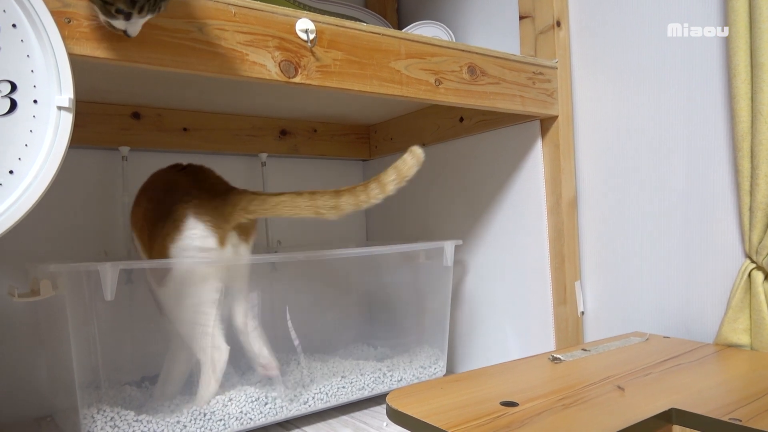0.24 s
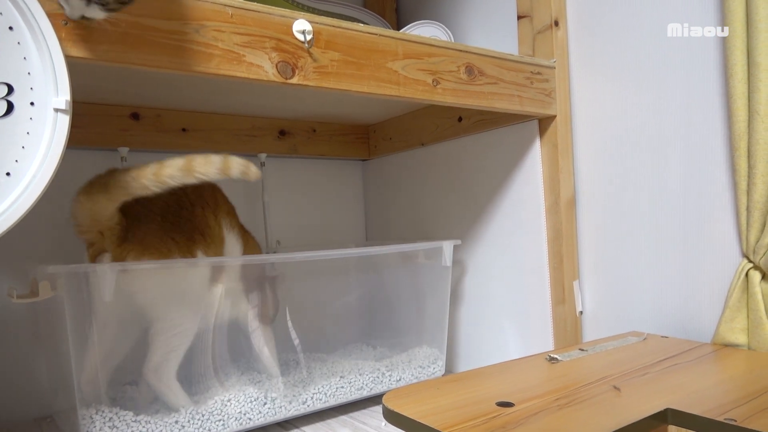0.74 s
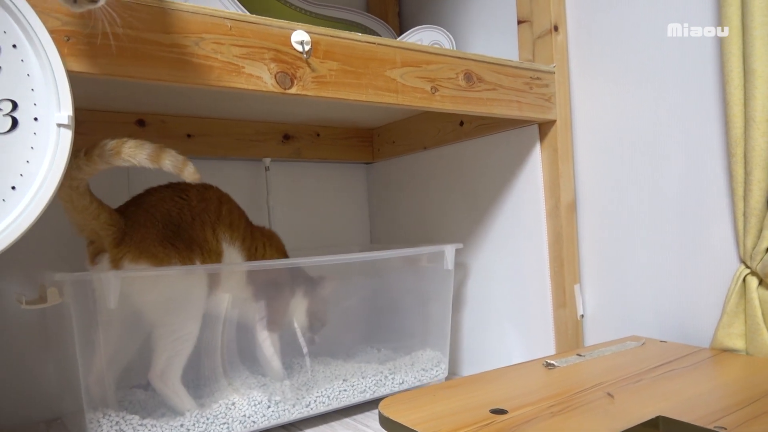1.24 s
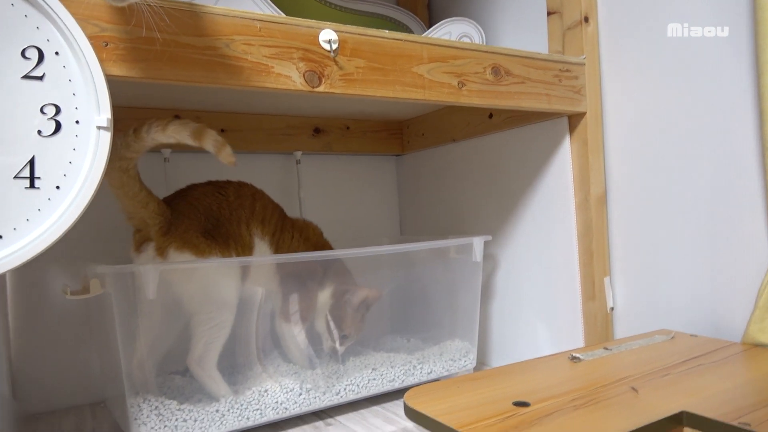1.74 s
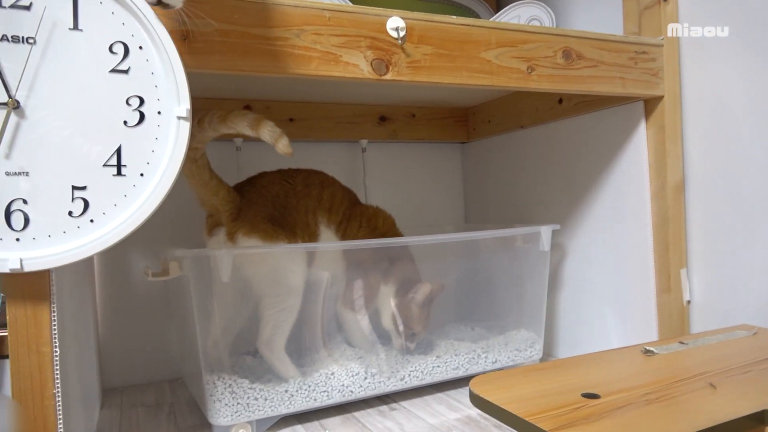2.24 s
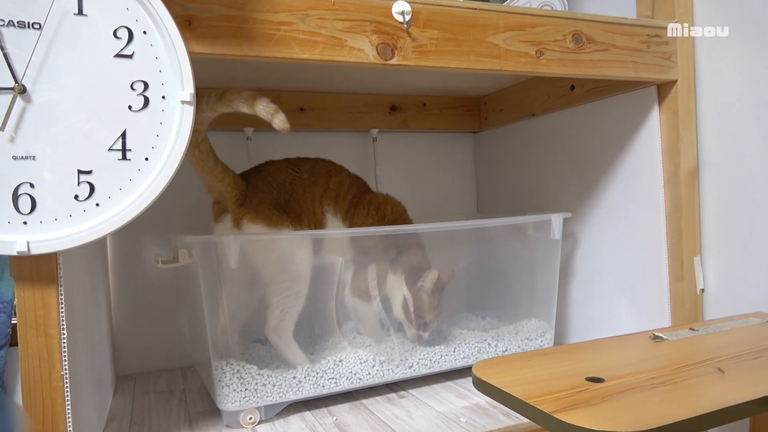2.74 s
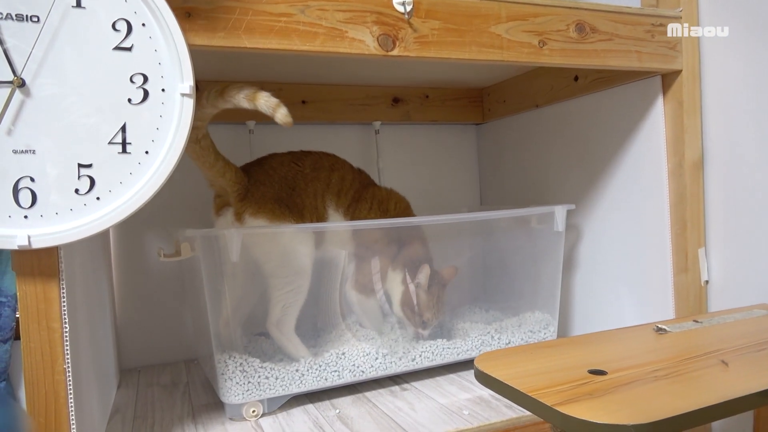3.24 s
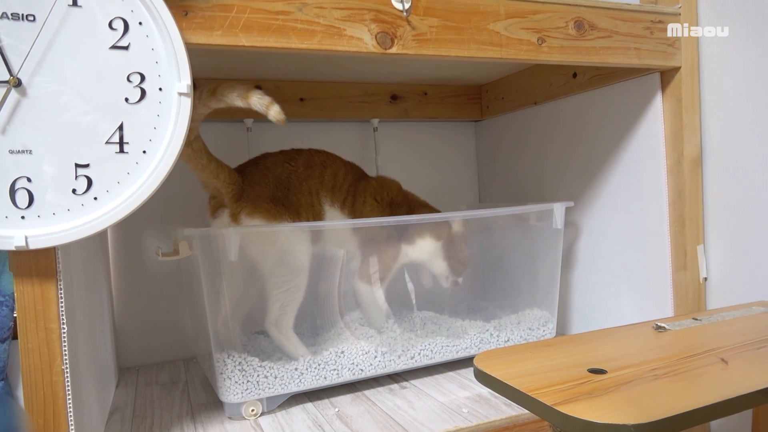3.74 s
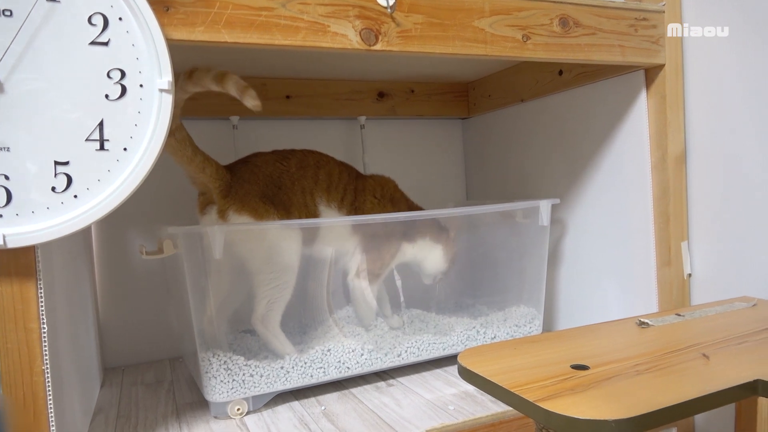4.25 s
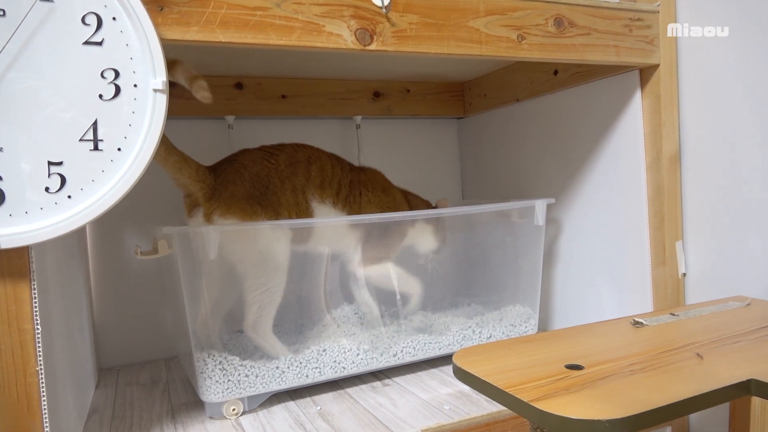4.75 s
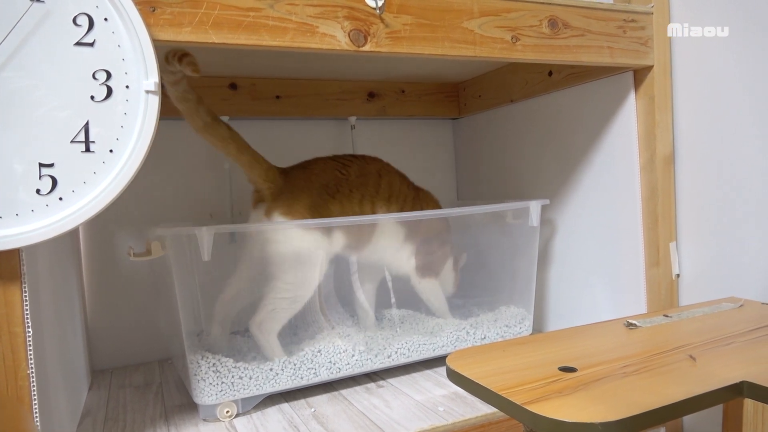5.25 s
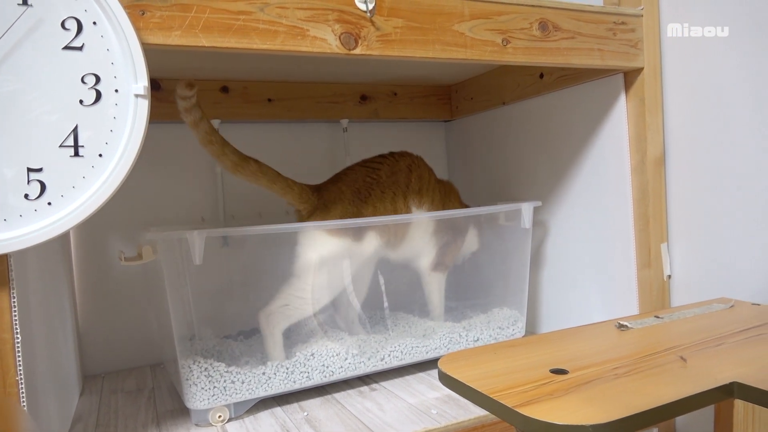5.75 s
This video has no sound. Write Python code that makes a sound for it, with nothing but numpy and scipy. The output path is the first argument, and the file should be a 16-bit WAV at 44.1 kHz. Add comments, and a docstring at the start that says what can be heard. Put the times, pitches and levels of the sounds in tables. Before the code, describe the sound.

Pellet litter crunches and rattles in short bursts as a cat digs, its paws and flung pellets knocking against a plastic box.

```python
"""Cat raking litter

A cat turns round and rakes pellet litter in a big plastic tub in a wooden alcove. Each stroke bites,
pushes and settles: an avalanche of pellet collisions that sounds through the tub. Light treads crunch
in between, and paws and flung pellets knock on the walls. Soft low bumps and a faint room hush lie
underneath, with a few faint high squeaks and a passing hum."""
import sys
import numpy as np
from scipy import signal
from scipy.fft import rfft, irfft
from scipy.io import wavfile
from scipy.ndimage import uniform_filter1d

SR = 44100
rng = np.random.default_rng(int(sys.argv[2]) if len(sys.argv) > 2 else 0)


def unload_wav(signal):
    """Save mono or channel-first audio to the path in sys.argv[1] as 16-bit WAV at rate SR, clipped to [-1, 1]."""
    wavfile.write(
        sys.argv[1],
        SR,
        np.round(np.clip(np.atleast_2d(signal).T, -1, 1) * 32767).astype(np.int16),
    )


N = 264600
TIME = np.arange(N) / SR


def from_db(db):
    return 10 ** (np.asarray(db) / 20)


def rms_one(x):
    return x / np.sqrt(np.mean(x ** 2) + 1e-20)


def fader(rows):
    """Gain curve through (t/s, level/dB) points, fading quickly outside their span."""
    times, levels = np.transpose(rows)
    gate = np.interp(TIME, [times[0] - .01, times[0], times[-1], times[-1] + .02], [0, 1, 1, 0])
    return gate * from_db(np.interp(TIME, times, levels))


def swell(start, length):
    """Envelope that peaks a quarter of the way in and has mostly faded by the end."""
    age = np.maximum(TIME - start, 0) * 4 / length
    return age * np.exp(1 - age)


def drift(per_s):
    """Random modulation gliding between points of spread 1."""
    knots = rng.standard_normal(4000)
    return np.interp(TIME * per_s, np.arange(len(knots)), knots)


def colour(x, spectrum):
    """Minimum-phase EQ through (f/Hz, relative level/dB) points; white noise keeps its power."""
    size = 4096
    hz, db = np.transpose(spectrum)
    log_bins = np.log(np.fft.rfftfreq(size, 1 / SR) + 1)
    gain = rms_one(from_db(np.interp(log_bins, np.log(hz), db)))
    cepstrum = irfft(np.log(gain))
    cepstrum[1:size // 2] *= 2
    cepstrum[size // 2 + 1:] = 0
    return signal.oaconvolve(x, irfft(np.exp(rfft(cepstrum))))[:len(x)]


def resonance(x, hz, q, lift_db):
    """The ringing band that, added to x, boosts it by lift_db at hz."""
    return (from_db(lift_db) - 1) * signal.lfilter(*signal.iirpeak(hz, q, SR), x)


def ring_out(t60, rise_s):
    """Countless overlapping modes: noise that builds up and dies, with energy 1."""
    t = TIME[:SR // 2]
    tail = rng.standard_normal(len(t)) * from_db(-60 * t / t60) * (1 - np.exp(-t / rise_s))
    return tail[t < 2 * t60] / np.linalg.norm(tail)


def push(start, length, bite_db, end_db, fall_db_per_s, bite_db_per_s=1083):
    """Envelope of one paw move: a quick bite, a ramp while it pushes, a fall as the heap settles."""
    ages = [-.05, 0, length, length + 1]
    levels = [bite_db + ages[0] * bite_db_per_s, bite_db, end_db, end_db - fall_db_per_s]
    active = (TIME > start + ages[0]) & (TIME < start + ages[-1])
    gain = np.zeros(N)
    gain[active] = from_db(np.interp(TIME[active] - start, ages, levels))
    return gain


# Paw moves; levels are crunch sends, and boom and rattle are offsets from them, all ahead of the mix.
# Light treads and small slides: t/s, level/dB, boom/dB, rattle/dB
PAW_TREADS = [(0.0, -38, -12.5, -15), (0.083, -41, 0.5, -11), (0.35, -51.5, 1, -41),
              (0.408, -49, -0.5, -13), (0.76, -43.5, -7, -13), (0.836, -40.5, -7, -10),
              (0.96, -50.5, -4, -12), (1.258, -48.5, -15, -7.5), (1.51, -42, -5, -14),
              (1.575, -45.5, -8, -13), (1.868, -49, -4.5, -15), (2.122, -40.5, -15.5, -8.5),
              (2.219, -58, -13, 3), (3.18, -33, 10, -3), (3.325, -43, -5.5, -7.5), (4.255, -56, 5.5, -32),
              (4.305, -55.5, 8, -32), (4.61, -42, -10, -2), (4.726, -45.5, -8, -1), (4.832, -34, -9, -12),
              (4.915, -45.5, -6, -26), (5.012, -42, -13, -12), (5.098, -40.5, -6, -12.5),
              (5.545, -37.5, -5.5, -10), (5.595, -38, -11, -6), (5.702, -30, -8.5, -5.5),
              (5.765, -47, -5, -27)]
# Litter creeping under the cat's weight: t/s, level/dB
LITTER_CREEP = [(0, -53), (.85, -48), (1.1, -60), (1.5, -55), (1.75, -59), (2.35, -60), (2.95, -67),
                (3.6, -86), (4.15, -72.5), (4.5, -51.5), (5.25, -56.5), (5.45, -60.5), (6, -76)]
# Raking strokes: t/s, push/s, bite level/dB, end level/dB, fall/(dB/s), boom/dB, rattle/dB, spot f/Hz
PAW_STROKES = [ (0.153, 0.032, -31, -32, 258, -2, -11, 1090), (0.55, 0.11, -30.5, -24.5, 310, -7, -13, 587),
               (1.985, 0.056, -39, -34, 106, -2.5, -17, 790), (2.52, 0.12, -30, -24.5, 190.5, -6, -11, 914),
               (3.05, 0.083, -27.5, -33.5, 197, -8.5, -10, 920),
               (3.12, 0.032, -29.5, -19.5, 143, -12, -11.5, 904),
               (4.383, 0.14, -40, -43.5, 100, -9, -15, 650),
               (4.501, .222, -34, -33, 136.5, -8.5, -11.5, 610),
               (5.155, 0.15, -37.5, -37.5, 198, -9, -10.5, 1200),
               (5.266, 0.012, -24, -26, 292, -7.5, -7.5, 624),
               (5.611, 0.027, -20, -23, 355, -5.5, -8.5, 2340), ]


def paw_work():
    """Envelopes of crunch, boom and rattle: strokes, treads and creep add up in power."""
    moves = [(push(*shape), boom, rattle) for *shape, boom, rattle, _ in PAW_STROKES]
    for start, db, boom, rattle in PAW_TREADS:
        moves.append((push(start, 0.0058, db, db, fall_db_per_s=348), boom, rattle))
    moves.append((fader(LITTER_CREEP), -4, -6.5))
    return np.sqrt(sum(np.outer(from_db([0, boom, rattle]), gain) ** 2 for gain, boom, rattle in moves))


def under_paw(x):
    """Each stroke leans on another spot of the tub and brings out its resonance until the next one."""
    out = x.copy()
    starts = [int(row[0] * SR) for row in PAW_STROKES]
    for first, last, (*_, hz) in zip(starts, starts[1:] + [N], PAW_STROKES):
        out[first:last] += resonance(x[first:last], hz, q=6, lift_db=5)
    return out


def collisions(per_s, spread_db, clump_db):
    """Pellet impacts of uneven size, bunched by stick and slip, then levelled over about 25 ms."""
    sizes = from_db(spread_db * np.minimum(rng.exponential(1, N), 4)) * rng.choice([-1, 1], N)
    hits = rng.random(N) < per_s / SR
    clicks = sizes * hits * from_db(clump_db * drift(130))
    power = np.abs(uniform_filter1d(clicks ** 2, size=1100))
    return clicks / np.sqrt(power + 0.009)


def scatter(clicks, t60, spots):
    """Impacts land on several spots, each with a short ring of its own."""
    spot = rng.integers(0, spots, N)
    return sum(signal.oaconvolve(clicks * (spot == k), ring_out(t60, rise_s=0.00035))[:N]
               for k in range(spots))


def ticks(clicks, low_hz, high_hz, cycles, pitches):
    """Each impact rings briefly at a pitch set by pellet size and place."""
    kind = rng.integers(0, pitches, N)
    out, t = np.zeros(N), TIME[:SR // 40]
    for k, hz in enumerate(np.linspace(low_hz, high_hz, pitches)):
        tick = np.sin(2 * np.pi * hz * t) * from_db(-60 * t * hz / cycles)
        out += signal.oaconvolve(clicks * (kind == k), tick / np.linalg.norm(tick))[:N]
    return out


# EQ for the boom of the floor, the crunch of the heap and the rattle on top: f/Hz, relative level/dB
BOOM_EQ = [(30, -52), (100, -28), (170, -9), (340, 4.5), (450, 2), (650, -13), (1400, -40)]
CRUNCH_EQ = [(250, -57), (450, -11.5), (600, -1.5), (900, 2), (1300, 1), (2000, -3), (2800, -10.5),
             (4000, -20.5), (8000, -40.5)]
RATTLE_EQ = [(1500, -17), (2800, 2.5), (4000, 1), (5200, -1.5), (7000, -5), (10000, -8.5), (12500, -19.5),
             (16000, -25)]


def digging(rest_per_s=650, extra_per_s=3600):
    """A harder push makes more pellets collide; buried ones sound dull, loose ones rattle and tick."""
    crunch, boom, rattle = paw_work()
    per_s = rest_per_s + extra_per_s * np.sqrt(crunch / crunch.max())
    buried = collisions(per_s, spread_db=2, clump_db=2)
    loose = collisions(.7 * per_s, spread_db=3.5, clump_db=2)
    thrown = collisions(.08 * per_s, spread_db=4, clump_db=4)   # pellets meeting clear of the heap
    ticking = ticks(thrown, low_hz=2470, high_hz=14900, cycles=36, pitches=18)
    floor = from_db(-3) * scatter(buried * boom, t60=0.05, spots=12)
    heap = from_db(-3.5) * under_paw(scatter(buried * crunch, t60=0.034, spots=16))
    surface = from_db(-2.5) * scatter(loose * rattle, t60=0.09, spots=6)
    surface += from_db(-6) * scatter(ticking * rattle, t60=0.012, spots=4)
    return colour(floor, BOOM_EQ) + colour(heap, CRUNCH_EQ) + colour(surface, RATTLE_EQ)


# Panel resonances of the tub: f/Hz, width/Hz, lift/dB
TUB_MODES = [(212, 22.5, 4.5), (320, 21, 2), (359, 19, 2.5), (580, 71, 8), (650, 30, 4.5), (808, 8.7, 2),
             (852, 126, 2), (1010, 120, 2.5), (1325, 26, -4), (1411, 25, 6.5), (1800, 23, 1), (1862, 27, 7),
             (1950, 33, 3.5), (2498, 44, 6.5), (2610, 90, 3.5), (2935, 48, 2), (3020, 33, 6), (3430, 51, 3),
             (4590, 570, 4)]


def tub(x):
    """The tub's broad panels lift their own resonances out of whatever shakes them."""
    return x + sum(resonance(x, hz, hz / width_hz, lift_db) for hz, width_hz, lift_db in TUB_MODES)


# EQ on the alcove's reverb: f/Hz, relative level/dB
ALCOVE_EQ = [(60, 9.5), (300, 2), (1000, -0.5), (4000, -9), (16000, 2.5)]


def alcove(x):
    """The close wooden walls return a short, warm reverb."""
    reflections = signal.oaconvolve(x, ring_out(t60=0.24, rise_s=0.0028))[:N]
    return from_db(-13) * colour(reflections, ALCOVE_EQ)


# Room tone EQ: f/Hz, relative level/dB
HUSH_EQ = [(30, -53), (80, -2.5), (145, -14.5), (230, -2.5), (311, 8.5), (370, -2), (600, -1.5),
           (1500, -4.5), (4300, -11.5), (7000, -16.5), (10000, -24.5), (16000, -53)]


def hush():
    """A faint, steady bed of room noise."""
    return from_db(-63.5) * colour(rng.standard_normal(N), HUSH_EQ)


# Fader ride of the movement rumble: t/s, level/dB
RUMBLE_RIDE = [(0, -83), (.18, -52.5), (.36, -70), (.6, -58), (1.1, -59), (1.27, -74), (1.47, -50.5),
               (1.65, -67.5), (1.8, -55.5), (2.13, -55), (2.25, -74), (2.53, -54.5), (2.85, -75),
               (3.5, -88), (4.4, -85), (4.6, -67), (4.9, -81), (5.3, -74), (6, -76)]


def rumble(lumpy_db=2.5):
    """Dull rumble of movement: low noise, levelled, then ridden up and down with a lumpy wobble."""
    eq = [(20, -18), (45, -55), (65, 4), (135, 11), (200, -13), (400, -11), (1200, -55)]
    noise = colour(rng.standard_normal(N), eq)
    noise /= np.sqrt(uniform_filter1d(noise ** 2, size=1600))
    return fader(RUMBLE_RIDE) * from_db(lumpy_db * drift(22.06)) * noise


# Blows on the tub; levels are clack sends, and snap and thud are offsets, all ahead of the make-up gains.
# Flung pellets, hard and light: t/s, level/dB, snap/dB, spot f/Hz, t60/s
PELLET_BLOWS = [(0.062, -34.5, -11, 1470, 0.071), (0.407, -34.5, -3.5, 1790, 0.062),
                (0.795, -43, 0, 890, 0.077), (0.834, -28.5, -9, 1970, 0.073), (0.888, -39, -6, 1170, 0.09),
                (0.956, -39, -7, 814, 0.065), (1.228, -36.5, -8.5, 1780, 0.12),
                (1.278, -37.5, -10, 1860, 0.066), (1.317, -38.5, -7, 1960, 0.1),
                (1.467, -29, -7.5, 1450, 0.083), (1.544, -32.5, -4.5, 890, 0.091),
                (1.619, -39.5, -14, 924, .07), (2.31, -27, 3.5, 2020, 0.058), (2.342, -34, 1, 3020, 0.068),
                (2.379, -35.5, 0.5, 1980, 0.059), (2.412, -55, 12, 3000, .035),
                (2.43, -41, -1, 1960, 0.073), (2.515, -25, -7.5, 920, 0.046),
                (2.79, -49.5, 2.5, 1900, 0.15), (3.03, -50.5, 10.5, 940, 0.064),
                (3.049, -24, -3, 950, 0.059), (3.26, -28.5, -8.5, 1100, .034),
                (3.911, -43, -8.5, 2080, 0.04), (4.857, -24.5, -11, 1000, 0.1),
                (5.054, -51, 9, 3000, 0.094), (5.321, -20.5, -6, 1770, 0.068),
                (5.607, -25.5, 3, 2600, 0.086), (5.859, -62.5, 7.5, 3000, 0.079)]
# Paws, soft and heavy: t/s, level/dB, thud/dB, spot f/Hz, t60/s
PAW_BLOWS = [(0.119, -26, -3, 830, 0.16), (0.145, -29.5, 7, 880, 0.1), (0.316, -34, -4, 1120, 0.066),
             (0.342, -33.5, -6, 865, 0.055), (0.543, -29, 5.5, 1070, 0.15), (0.66, -19, -8, 1140, .03),
             (0.794, -34, -10, 590, 0.089), (1.468, -35.5, 3, 590, 0.12), (1.543, -26, -9.5, 741, 0.12),
             (1.986, -37, 4, 810, 0.054), (2.501, -31, -8, 1020, 0.09), (2.628, -15.5, -14, 930, 0.079),
             (3.038, -28.5, -3, 960, 0.15), (3.359, -36, -23, 1000, 0.051), (3.912, -50.5, 9, 537, .06),
             (5.001, -35.5, -22, 1310, 0.059), (5.153, -29.5, -4.5, 2440, 0.025),
             (5.241, -28, -9, 1020, 0.072), (5.364, -31.5, -1.5, 900, 0.045),
             (5.606, -18.5, 4.5, 2620, 0.073), (5.635, -17.5, -7.5, 1730, .04),
             (5.697, -22.5, -1.5, 650, 0.035)]
# EQ for the clack of the wall and the snap of the contact: f/Hz, relative level/dB
CLACK_EQ = [(250, -19), (500, -0.5), (900, 2.5), (1300, 1.5), (1800, 1.5), (2700, -7), (4000, -9.5),
            (8000, -57)]
SNAP_EQ = [(1500, -7), (2800, 3.5), (4000, 2), (5200, 2), (7000, -2.5), (10000, -8.5), (12500, -14),
           (16000, -25)]


def knocks(thud_gain_db=17, clack_gain_db=19, snap_gain_db=20):
    """Single blows on plastic: the floor thuds, the struck spot clacks and the contact snaps."""
    blows = [(start, hz, db + thud, db, db - 18, t60) for start, db, thud, hz, t60 in PAW_BLOWS]
    blows += [(start, hz, db - 10.5, db, db + snap, t60) for start, db, snap, hz, t60 in PELLET_BLOWS]
    out = np.zeros(N + SR)
    for start, hz, thud, clack, snap, t60 in blows:
        floor, wall, contact = [colour(ring_out(t60, rise_s=0.00038), eq)
                                for eq in (BOOM_EQ, CLACK_EQ, SNAP_EQ)]
        wall = wall + resonance(wall, hz, q=6, lift_db=7)
        levels = (thud + thud_gain_db, clack + clack_gain_db, snap + snap_gain_db)
        for db, layer in zip(levels, (floor, wall, contact)):
            out[int(start * SR):][:len(layer)] += from_db(db) * layer / np.linalg.norm(layer)
    return out[:N]


# Soft low bumps: t/s, peak level/dB, f/Hz, length/s
SOFT_BUMPS = [(.145, -38.5, 177, 0.061), (.272, -42.5, 156, 0.014), (.44, -50, 152, 0.023),
              (.952, -43, 107, 0.047), (1.032, -40.5, 128, 0.02), (1.036, -45.5, 72, 0.057),
              (1.146, -49, 150, 0.019), (1.912, -39, 128, 0.027), (1.93, -37, 67, 0.049),
              (3.65, -54, 206, 0.02), (5.467, -58, 110.6, 0.021), (5.609, -34.5, 166, 0.027)]


def bumps():
    """Well damped low resonances that swell and die within a few cycles."""
    return sum(from_db(db) * swell(start, length) * np.sin(2 * np.pi * hz * (TIME - start))
               for start, db, hz, length in SOFT_BUMPS)


# Faint high squeaks: t/s, peak level/dB, f/Hz, width/Hz, length/s
HIGH_SQUEAKS = [(1.626, -74, 9100, 110, 0.11), (1.75, -77, 11600, 140, .04), (3.58, -69, 8060, 900, .04),
                (3.677, -62.5, 11300, 2600, 0.037), (4.343, -59, 6700, 700, 0.032)]


def squeaks(sag_hz_per_s=4200):
    """Narrow bands of high noise that swell fast, sag in pitch and fade."""
    out = np.zeros(N)
    for start, db, hz, width_hz, length in HIGH_SQUEAKS:
        lowpass = signal.butter(2, width_hz / 2, fs=SR)
        waver = rms_one(signal.lfilter(*lowpass, rng.standard_normal((2, N))))
        phase = 2 * np.pi * np.cumsum(hz - sag_hz_per_s * (TIME - start)) / SR
        tone = waver[0] * np.cos(phase) + waver[1] * np.sin(phase)
        out += from_db(db) * swell(start, length) * tone
    return out


# Fader ride of the passing hum: t/s, level/dB
HUM_RIDE = [(3.65, -91), (4.0, -72), (4.2, -75), (4.5, -85.5)]


def hum(hz=75):
    """A faint low tone that wavers slightly as it comes and goes."""
    return fader(HUM_RIDE) * np.sqrt(2) * np.sin(2 * np.pi * hz * TIME + .4 * drift(6.8))


def scene():
    """Litter and knocks ring through the tub and join the squeaks in the alcove; the rest stays dry."""
    direct = tub(digging() + knocks()) + squeaks()
    return (direct + alcove(direct) + rumble() + bumps() + hum() + hush())[None]


def record(dry, cutoff_hz=15750):
    """A steep high cut on the whole mix."""
    return signal.sosfilt(signal.ellip(10, .1, 70, cutoff_hz, fs=SR, output="sos"), dry)


dry = scene()
out = record(dry)
unload_wav(out)
```